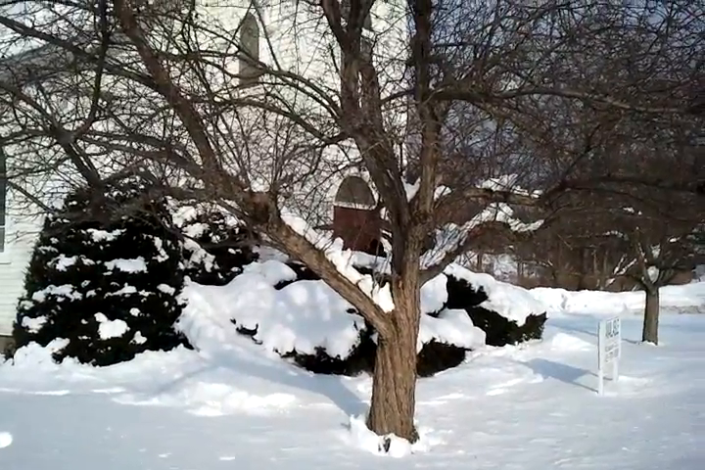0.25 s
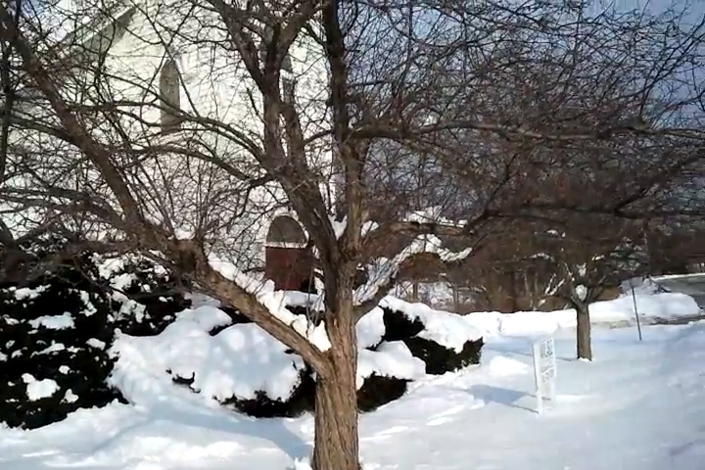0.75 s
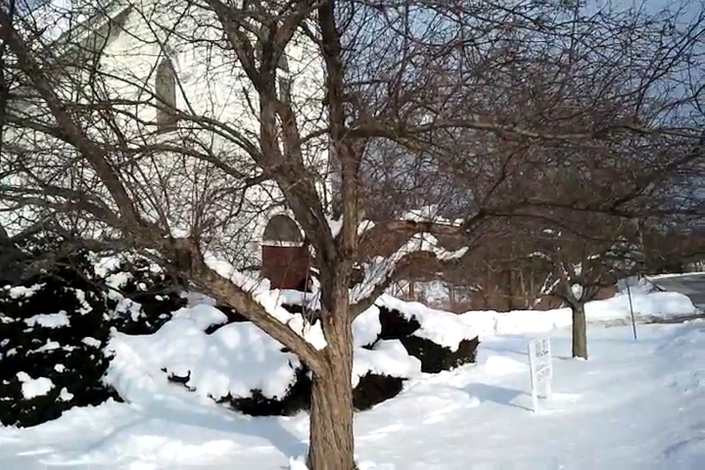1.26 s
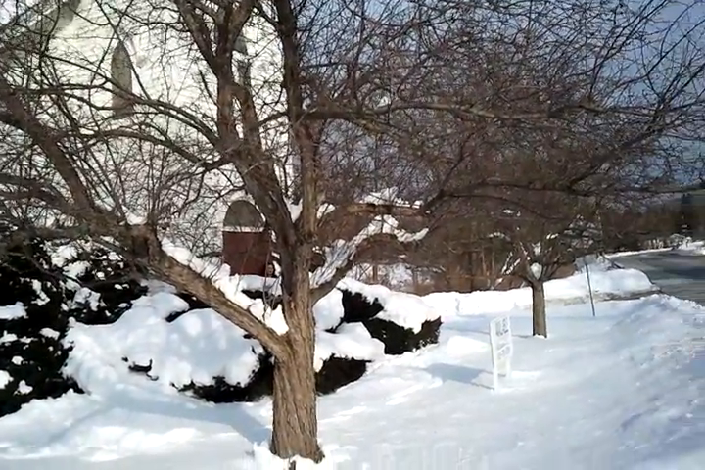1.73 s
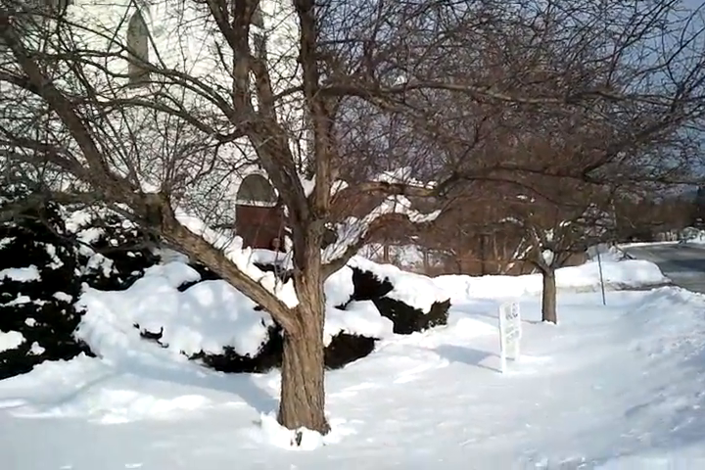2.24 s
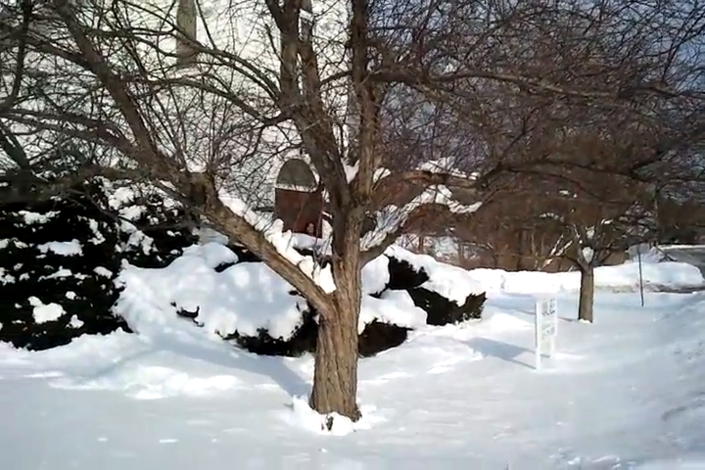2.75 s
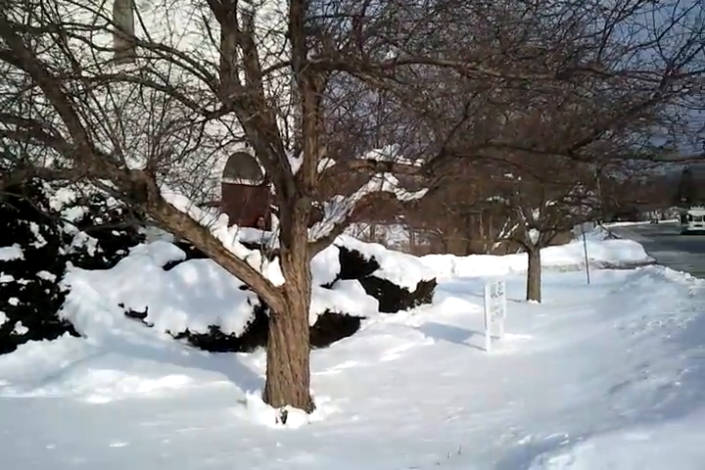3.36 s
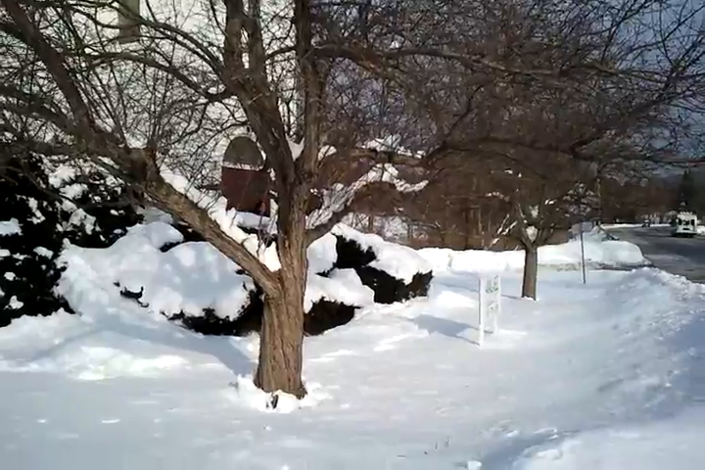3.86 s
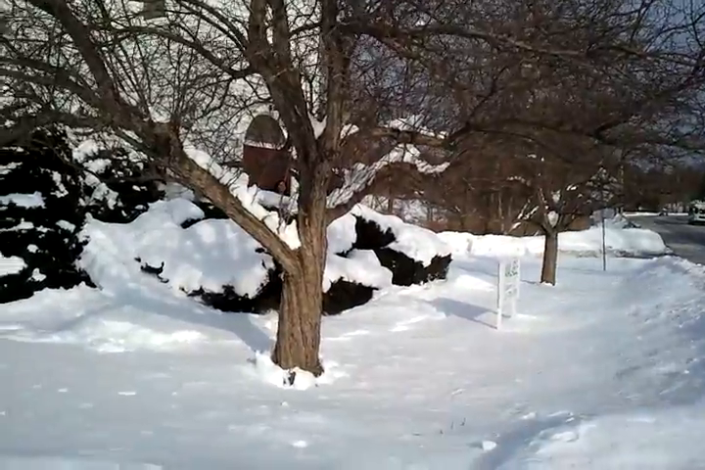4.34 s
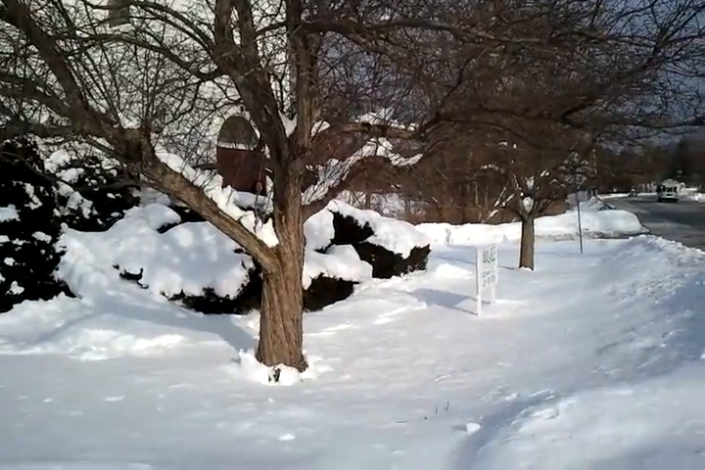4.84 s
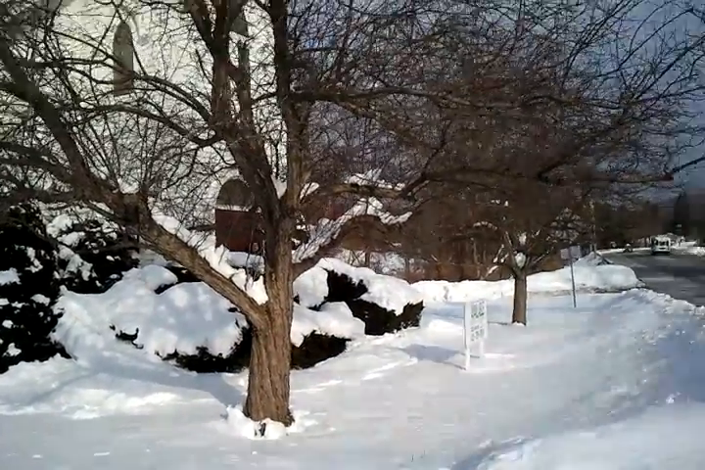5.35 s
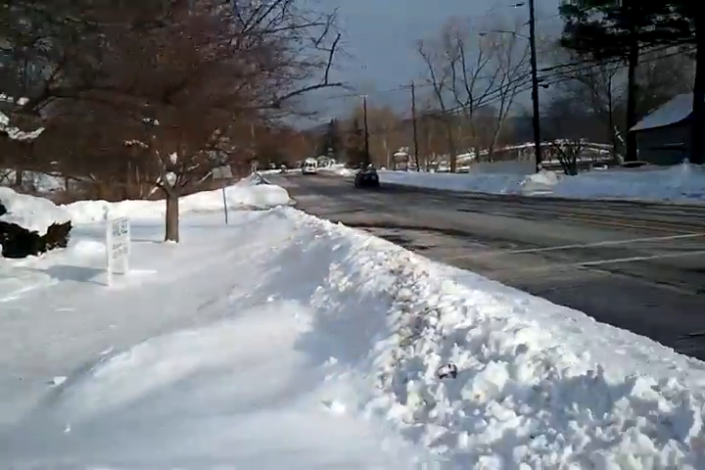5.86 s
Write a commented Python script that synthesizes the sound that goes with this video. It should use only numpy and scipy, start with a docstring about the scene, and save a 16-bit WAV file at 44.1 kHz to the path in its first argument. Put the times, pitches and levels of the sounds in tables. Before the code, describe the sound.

A close wash of wet tyres opens, swells around one second, brightens into hiss near two and dwindles into the distance. Soft low wind puffs bump the unshielded microphone irregularly; the strongest cluster, just after three seconds, overloads with crackling and momentary dropouts. More isolated thuds follow over the quiet receding car, with barely audible high squeaks late. Open roadside, slightly dull low-quality sound.

```python
"""Winter roadside: a car rolls past on wet asphalt behind a snow bank and drives off, its tyre noise fading.
The car is filtered noise: body rumble, tyre roar, ringing tread and hiss, with slush spray and mist above;
delayed copies from road and bank cut sliding dips into the tyre noise. Light wind breaks over the bare
microphone port in short low pressure swings and flurries of random pops. At set moments the diaphragm is
pinned: the car drops out and a snap marks the release. A few faint bright chirps rise late on."""
import sys
import numpy as np
from scipy import signal
from scipy.fft import rfft, irfft
from scipy.io import wavfile
from scipy.ndimage import uniform_filter1d

SR = 44100
rng = np.random.default_rng(int(sys.argv[2]) if len(sys.argv) > 2 else 0)


def wav_out(sig):
    """Save sig, one row per channel (or a flat mono array), as 16-bit PCM at SR to the path in sys.argv[1]."""
    wavfile.write(sys.argv[1], SR, np.round(np.clip(np.atleast_2d(sig).T, -1, 1) * 32767).astype(np.int16))


N = 268965


def from_db(db):
    """Decibel law: the amplitude gain of a level."""
    return 10 ** (np.asarray(db) / 20)


def rms_one(x):
    """Normalisation of power: the signal scaled to rms 1."""
    return x / np.sqrt(np.mean(x ** 2) + 1e-20)


def in_time(rows):
    """Linear interpolation: each column of a time table as one value per sample."""
    s, *columns = np.transpose(rows)
    return [np.interp(np.arange(N) / SR, s, column) for column in columns]


def follow(level_db, share):
    """Linear coupling: a level that makes a share of another's swing about its mean."""
    mean_db = level_db.mean()
    return mean_db + share * (level_db - mean_db)


def drift(rate_hz):
    """Low-passed noise: a slow random course of rms 1, from a double pole at the given rate."""
    step = 40      # samples between computed points
    r = np.exp(-2 * np.pi * rate_hz * step / SR)
    noise = rng.standard_normal(N // step + 2002)
    slow = signal.lfilter([1], [1, -2 * r, r * r], noise)[2000:]      # the filter has settled by here
    return np.interp(np.arange(N) / step, np.arange(len(slow)), rms_one(slow))


def coloured(spectrum, patchy_db):
    """Spectral shaping of noise to rms 1; its third-octave bands waver in three interleaved sets."""
    hz = np.maximum(np.arange(N // 2 + 1) * SR / N, 1)
    at_hz, level_db = np.transpose(spectrum)
    shape_db = np.interp(np.log(hz), np.log(at_hz), level_db, -90, -90)
    shaped = rfft(rng.standard_normal(N)) * from_db(shape_db)
    band_set = np.floor(3 * np.log2(hz / at_hz[0])) % 3
    wavering = [irfft(shaped * (band_set == k), N) * from_db(patchy_db * drift(5.4)) for k in range(3)]
    return rms_one(sum(wavering))


def resonance(x, hz, width_hz):
    """Damped oscillator: a two-pole peak with gain 1 on top."""
    r = np.exp(-np.pi * width_hz / SR)
    zeros = np.array([1, 0, -1]) * (1 - r * r) / 2
    poles = [1, -2 * r * np.cos(2 * np.pi * hz / SR), r * r]
    return signal.lfilter(zeros, poles, x)


def with_echo(x, rows, dull_hz):
    """Interference: a dulled copy, late by half a cycle of the dip, cancels there; power is roughly kept."""
    dip_hz, share = in_time(rows)
    share = np.clip(share, 0, .95)
    dull = signal.sosfilt(signal.butter(1, dull_hz, fs=SR, output="sos"), x)
    delay = SR / (2 * dip_hz)      # samples
    late = np.interp(np.arange(N) - delay, np.arange(N), dull)
    return (x + share * late) / np.sqrt(1 + share ** 2)


def tread_ring():
    """Forced resonance: gently wavering noise drives the tread grooves, each a peak passed twice."""
    # groove resonances: (frequency [Hz], width of each pass before widening [Hz], gain on top [dB])
    grooves = [(1045, 408, -2), (1377, 264, -12)]
    drive = rng.standard_normal(N) * from_db(0.63 * drift(25))
    ring = np.zeros(N)
    for hz, width_hz, db in grooves:
        wide_hz = 1.6 * width_hz
        once = resonance(drive, hz, wide_hz)
        ring += from_db(db) * resonance(once, hz, wide_hz)
    return rms_one(ring)


def car():
    """Tyre contact noise with reflections from road and snow bank, over body rumble and under spray."""
    # rms levels of the parts as the car passes:
    # (time [s], tyre roar [dB], tread ring [dB], tread hiss [dB], fine mist [dB])
    passing = [(0.02, -34, -29, -26.5, -39.5), (0.2, -32.5, -29, -27, -41), (0.88, -28.5, -22, -27, -43),
               (1.05, -29.5, -22.5, -27.5, -45), (1.25, -28.5, -22, -26, -45.5),
               (1.54, -32, -22.5, -31.5, -41.5), (1.88, -30.5, -24.5, -24.5, -40.5),
               (2.26, -34.5, -25, -23.5, -40.5), (2.79, -36, -27, -24.5, -44),
               (3.14, -37.5, -30.5, -25.5, -47.5), (3.67, -40, -32, -29.5, -49),
               (4.27, -43.5, -32.5, -31.5, -50), (4.32, -42.5, -33, -31, -49), (4.53, -41, -33, -31.5, -54),
               (4.88, -43.5, -33.5, -33, -51.5), (5.15, -40.5, -33, -32.5, -52.5),
               (5.57, -44, -36.5, -34, -54), (6.08, -44, -35.5, -39.5, -58.5)]
    # dip where the echo cancels the direct sound, sliding as the paths change:
    # (time [s], dip frequency [Hz], echo share [0-1])
    road_echo = [(0, 3500, 0.54), (.8, 3350, 0.05), (1.2, 2830, 0.24), (1.32, 2600, 0.56),
                 (1.6, 2540, 0.32), (1.8, 2560, 0.32), (2.102, 3410, 0.46), (6.1, 3500, 0.52)]
    bank_echo = [(0, 584, 0.073), (1.9, 640, 0.058), (2.299, 705, 0.22), (3.5, 705, 0.19), (4.7, 640, 0.1),
                 (5.202, 705, 0.16), (5.55, 990, 0.2), (5.801, 1140, 0.067), (6.1, 1200, 0.1)]
    # noise spectra, relative spectral density: (frequency [Hz], level [dB])
    rumble_spectrum = [(20, -33.5), (45, -10), (90, -3.5), (200, -3), (350, -0.5), (520, -26.5)]
    roar_spectrum = [(250, -49.5), (400, 0.5), (600, 1), (800, -1.5), (1050, -1.5)]
    hiss_spectrum = [(1000, -26), (1400, -2), (1900, 1.5), (2300, -5.5), (2900, -16), (3600, -47)]
    spray_spectrum = [(2300, -7.5), (2900, -6), (3700, -10), (4500, -5.5), (5300, -6), (6000, -8.5)]
    mist_spectrum = [(4900, -25), (5700, -3), (6500, 1), (7300, -2.5), (7700, -3), (8600, -8)]

    roar_db, ring_db, hiss_db, mist_db = in_time(passing)
    rumble_db = follow(roar_db, share=0.66) - 3
    spray_db = follow(mist_db, share=.75) - 1.5

    tyres = from_db(roar_db) * coloured(roar_spectrum, patchy_db=1.0)
    tyres += from_db(ring_db) * tread_ring()
    tyres += from_db(hiss_db) * coloured(hiss_spectrum, patchy_db=0.9)
    tyres = with_echo(tyres, road_echo, dull_hz=5370)
    tyres = with_echo(tyres, bank_echo, dull_hz=1400)

    droplets = from_db(0.58 * drift(160))      # the finest spray comes in grains
    spray = from_db(spray_db) * coloured(spray_spectrum, patchy_db=1.1)
    mist = from_db(mist_db) * droplets * coloured(mist_spectrum, patchy_db=1.04)
    rumble = from_db(rumble_db) * coloured(rumble_spectrum, patchy_db=3.0)
    return rumble + tyres + spray + mist


def add(out, s, shape):
    """Superposition: mixes a shape in, centred on a time."""
    i = max(round(s * SR) - len(shape) // 2, 0)
    out[i:i + len(shape)] += shape[:N - i]


def eddy(hz, phase, cycles):
    """Vortex passage: a pressure swing of about one cycle under a bell of the given spread."""
    turns = np.arange(-2 * SR // hz, 2 * SR // hz) * hz / SR
    return np.exp(-.5 * (turns / cycles) ** 2) * np.cos(2 * np.pi * turns + phase)


def wind():
    """Turbulence at the port: single eddies, each over a slower push, and flurries of small ones in gusts."""
    # the strongest eddies on the port: (time [s], reference level for the three parts [dB], pitch [Hz])
    puffs = [(1.078, -11, 198), (1.192, -19, 280), (2.024, -12.5, 190), (2.585, -14.5, 178),
             (2.607, -11.5, 223), (3.045, -8.5, 346), (3.055, -7, 274), (3.087, 0.5, 452), (3.095, -8, 380),
             (3.099, -8, 273), (3.106, -14, 300), (3.125, -10, 330), (3.127, 4, 360), (3.133, -9, 273),
             (3.145, -10, 208), (3.148, -14, 300), (3.193, -12.5, 206), (3.214, -11, 328), (3.22, -10, 380),
             (3.228, -7, 320), (3.239, -11, 260), (3.249, -11.5, 195), (3.257, -11.5, 154),
             (3.279, -21, 157), (3.31, -13, 232), (3.324, -4, 203), (3.462, -15.5, 196), (3.738, -24, 200),
             (3.906, -15.5, 159), (3.938, -11, 305), (3.992, -15.5, 143), (4.189, -19.5, 246),
             (4.22, -14.5, 203), (4.273, -15, 357), (4.285, -21, 162), (4.442, -19, 152),
             (4.579, -21.5, 184), (4.739, -14.5, 200), (4.756, -4, 427), (4.762, -15, 138),
             (4.802, -16, 298), (4.83, -21, 168), (4.93, -7.5, 285), (4.944, -24, 342), (4.982, -22.5, 141),
             (5.473, -10.5, 347), (5.495, -7, 298), (5.56, -18, 247), (5.619, -18.5, 294),
             (5.856, -17, 217), (5.892, -14, 170), (5.898, -3.5, 342), (5.91, -4.5, 270),
             (5.964, -9.5, 223), (5.973, -18, 138), (6.008, -16.5, 202), (6.021, -15.5, 240)]
    # gusts, each a dense flurry under a bell: (middle [s], length, 0.42 of it the bell's spread [s],
    # bell peak [dB])
    gusts = [(0.785, 0.064, -33), (1.07, 0.092, -28.5), (1.206, 0.072, -27), (1.95, 0.11, -33),
             (2.022, 0.12, -29.5), (2.615, 0.15, -30), (3.059, 0.022, -23), (3.118, 0.038, -14.5),
             (3.222, 0.03, -18), (3.285, 0.078, -23), (3.472, 0.025, -29.5), (3.928, 0.081, -31.5),
             (4.232, 0.13, -32.5), (4.749, 0.024, -24), (4.826, .09, -29), (4.938, 0.039, -26.5),
             (5.483, 0.06, -25), (5.573, 0.086, -32.5), (5.702, 0.078, -33), (5.897, 0.042, -21),
             (6.018, 0.061, -34)]
    out, t = np.zeros(N), np.arange(N) / SR
    phases = rng.uniform(0, 2 * np.pi, (len(puffs), 2))
    for (s, level_db, hz), (fast, slow) in zip(puffs, phases):
        add(out, s, from_db(level_db - 1.5) * eddy(hz, fast, cycles=0.35))
        add(out, s, from_db(level_db - 11.5) * eddy(0.5 * hz, slow, cycles=0.34))
        # strong eddies steepen to a point: this part grows faster than the swing itself
        add(out, s, from_db(1.94 * level_db - 3) * eddy(2.9 * hz, fast, cycles=0.25))
    gust = np.zeros(N)
    for s, length, db in gusts:
        gust += from_db(db) * np.exp(-.5 * ((t - s) / (0.42 * length)) ** 2)
    return out + flurry(gust)


def flurry(gust):
    """Shot noise: random pops, a low lumpy part and a brighter part that grows faster than the gust."""
    pops_per_s, slow_db = 350, -3
    loud_gust_db, brightens = -18, 0.43      # gust with equal gain for the bright part, and exponent
    struck = rng.random((2, N)) < pops_per_s / SR
    pops = struck * rng.standard_normal((2, N)) + 1e-18      # an inaudible offset
    slow = signal.sosfilt(signal.butter(2, [60, 260], "band", fs=SR, output="sos"), pops[0])
    quick = signal.sosfilt(signal.butter(3, [170, 850], "band", fs=SR, output="sos"), pops[1])
    quick_gain = (gust / from_db(loud_gust_db)) ** brightens
    return gust * (from_db(slow_db) * rms_one(slow) + quick_gain * rms_one(quick))


def pinning():
    """Mechanical limiting: the diaphragm follows the air (1) or rests on its stop (0), and snaps as it lets go."""
    # diaphragm pinned: (start [s], length [s], first sample of the snap on release [dB])
    pinned = [(3.083, .004, -17), (3.098, .002, -25), (3.116, .004, -27), (3.134, .003, -28),
              (3.203, .003, -24), (3.254, .003, -25), (3.322, .003, -34), (4.752, .002, -33),
              (5.890, .002, -30), (5.896, .002, -31), (5.907, .002, -25)]
    free, snaps = np.ones(N), np.zeros(N)
    for s, length, snap_db in pinned:
        release = round((s + length) * SR)
        free[round(s * SR):release] = 0
        snaps[release] = from_db(snap_db)
    band = signal.butter(1, [700, 2800], "band", fs=SR, output="sos")
    snaps = signal.sosfilt(band, snaps + 1e-18) / band[0, 0]      # the first sample keeps its level
    return uniform_filter1d(free, size=20), snaps      # edges softened over 20 samples


def chirps():
    """Frequency modulation: tiny squeaks sliding up by about a sixth of their pitch."""
    # faint bright chirps: (middle [s], peak level [dB], start frequency [Hz], length [s])
    squeaks = [(4.835, -41, 6000, 0.0028), (4.847, -40, 5600, 0.0044), (4.86, -45, 7000, .006),
               (4.896, -48, 7000, .004), (5.526, -46, 6300, 0.0062), (6.06, -46, 5900, 0.013)]
    out = np.zeros(N)
    for s, peak_db, start_hz, length in squeaks:
        way = np.linspace(0, 1, max(round(length * SR), 8))
        turns = start_hz * length * way * (1 + 0.078 * way)
        add(out, s, from_db(peak_db) * np.sin(np.pi * way) * np.sin(2 * np.pi * turns))
    return out


def scene():
    """Superposition of all sources; the car alone drops out while the diaphragm is pinned."""
    free, snaps = pinning()
    return (free * car() + wind() + snaps + chirps())[None]


def record(dry):
    """Saturation and imaging: bass cut, rounded peaks, treble mirrored about half a slow converter's rate."""
    converter_hz, overload, knee = 16000, .6, 3      # sampling rate, amplitude ceiling, sharpness of the bend
    thin = signal.sosfilt(signal.butter(2, 52, "high", fs=SR, output="sos"), dry)
    rounded = thin / (1 + np.abs(thin / overload) ** knee) ** (1 / knee)
    band_limit = signal.ellip(12, .1, 60, converter_hz / 2 - 35, fs=SR, output="sos")
    sampled = signal.sosfilt(band_limit, rounded)
    mirrored = sampled * (1 + 2 * np.cos(2 * np.pi * converter_hz * np.arange(N) / SR))
    smoothed = signal.sosfilt(signal.butter(20, 7900, fs=SR, output="sos"), mirrored)
    top_cut = signal.cheby2(20, 50, 9230, fs=SR, output="sos")      # 50 dB down from 9230 Hz
    return signal.sosfilt(top_cut, smoothed)


dry = scene()
out = record(dry)
wav_out(out)
```